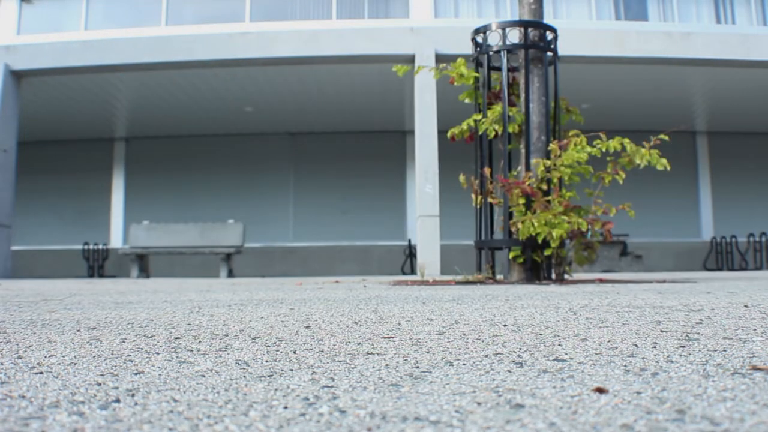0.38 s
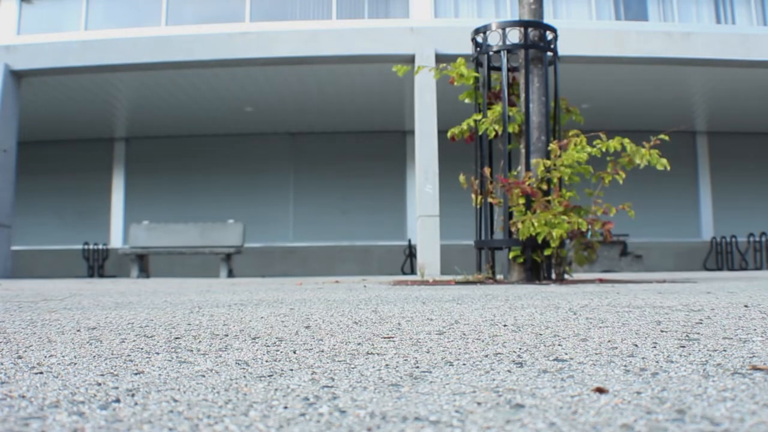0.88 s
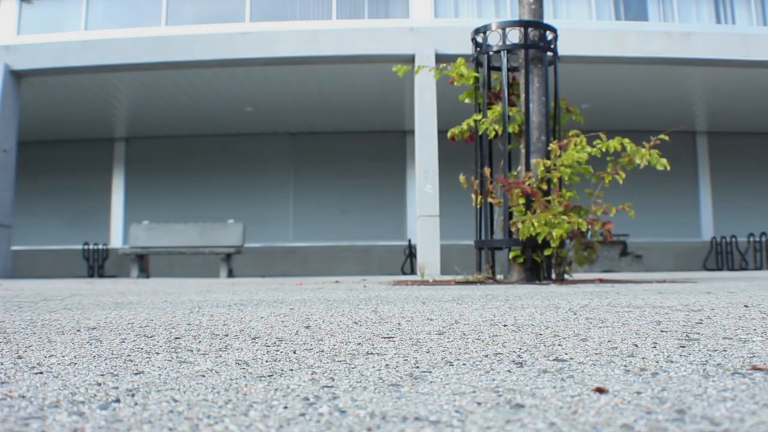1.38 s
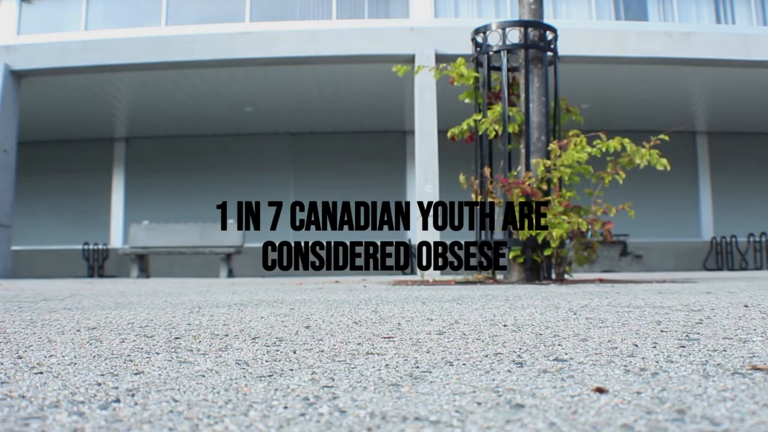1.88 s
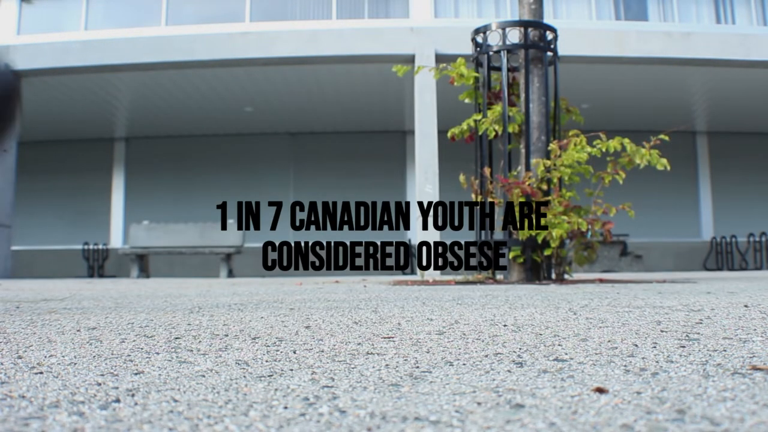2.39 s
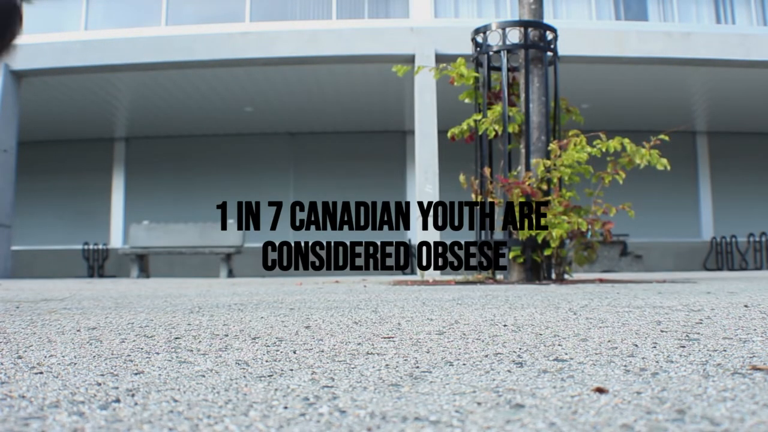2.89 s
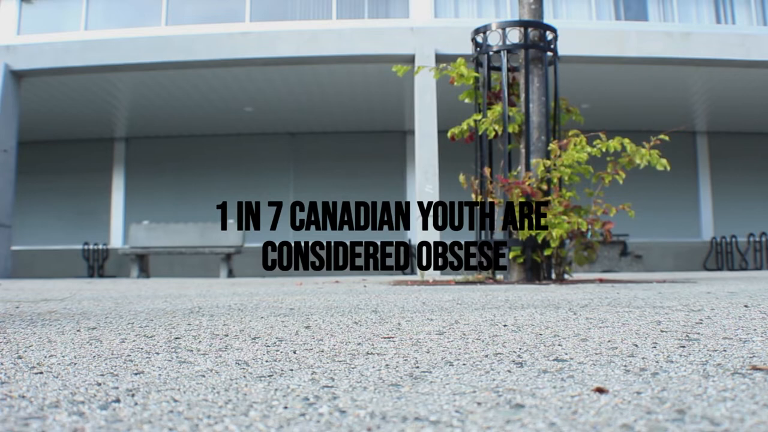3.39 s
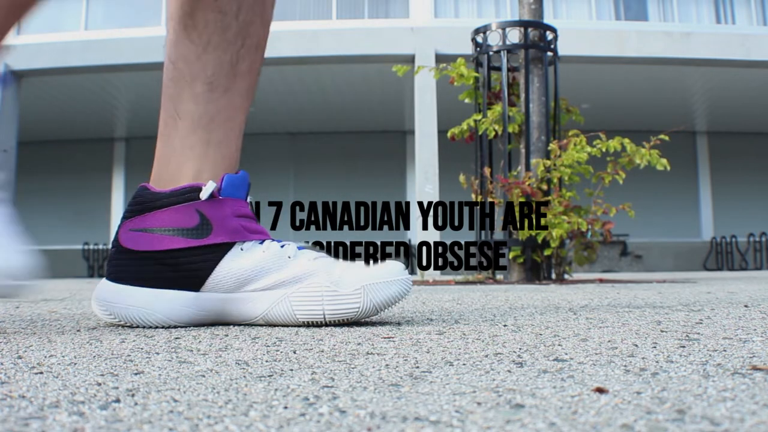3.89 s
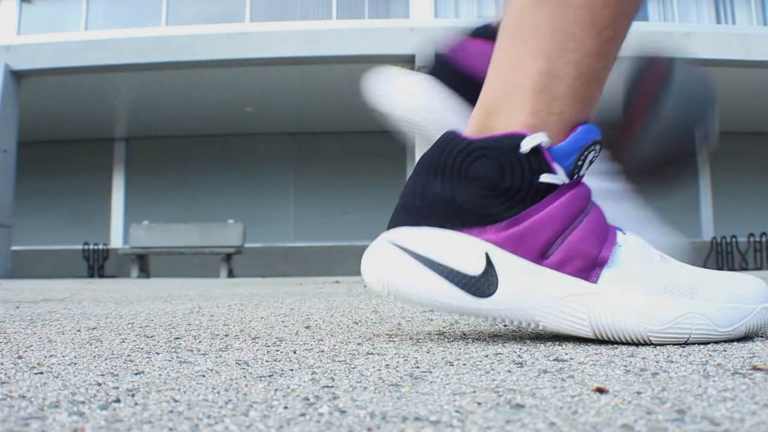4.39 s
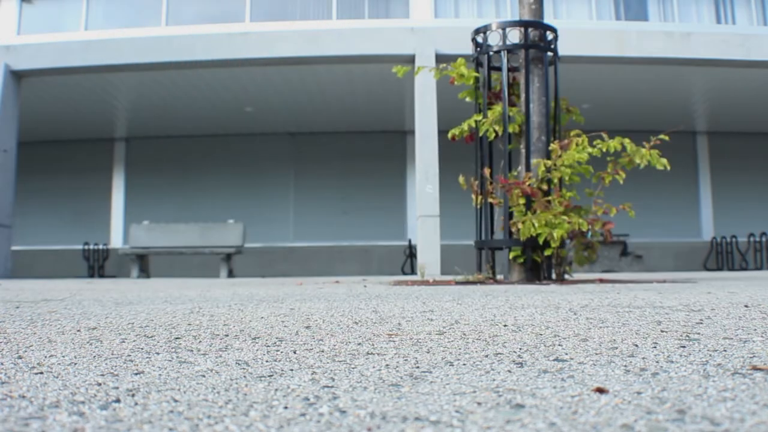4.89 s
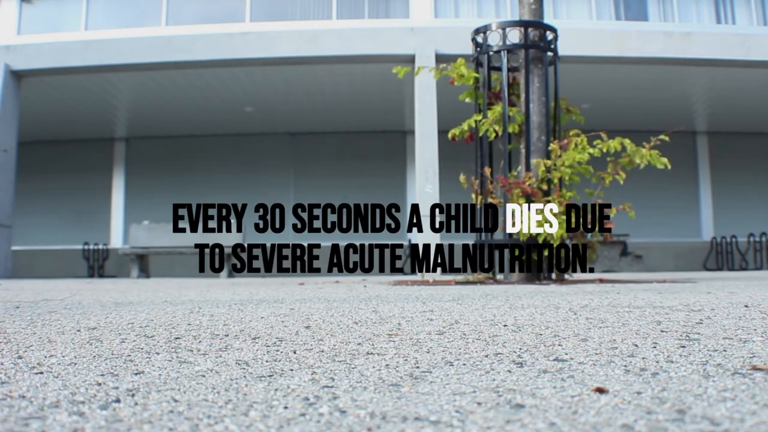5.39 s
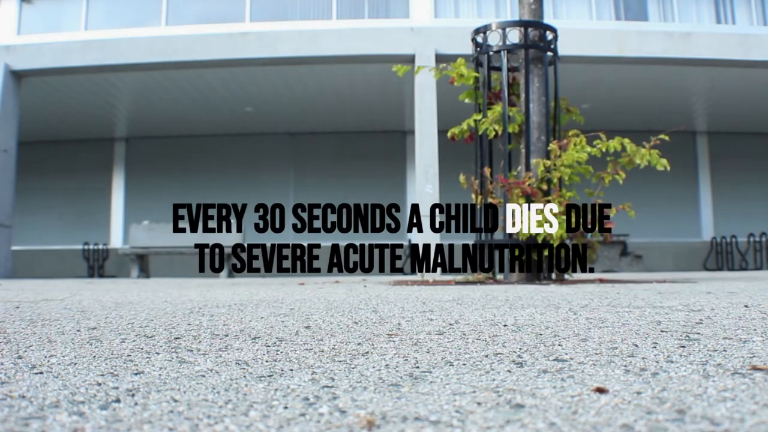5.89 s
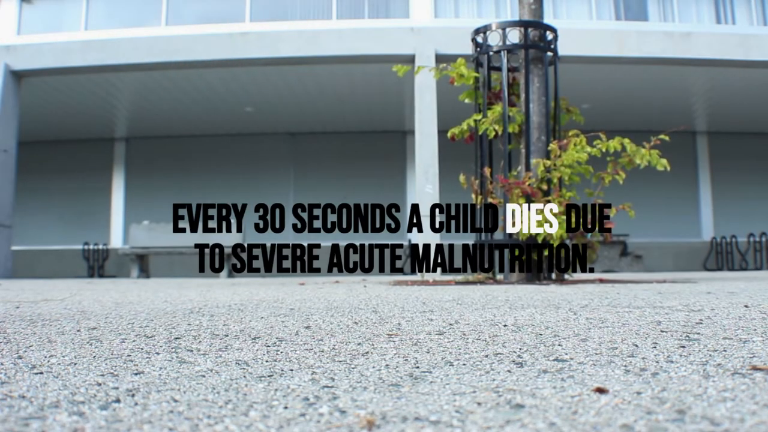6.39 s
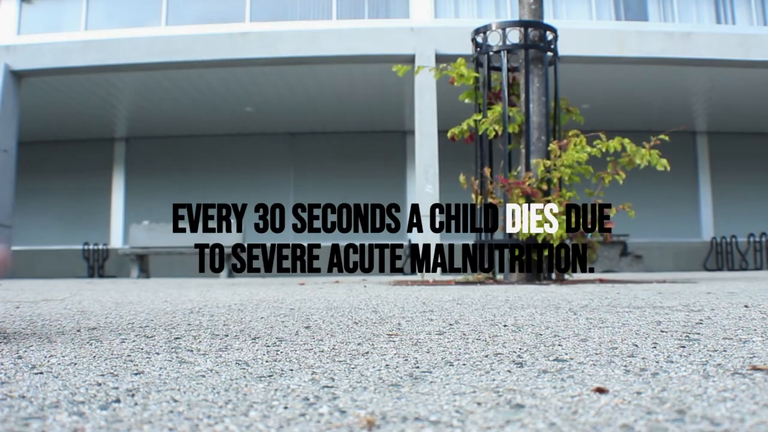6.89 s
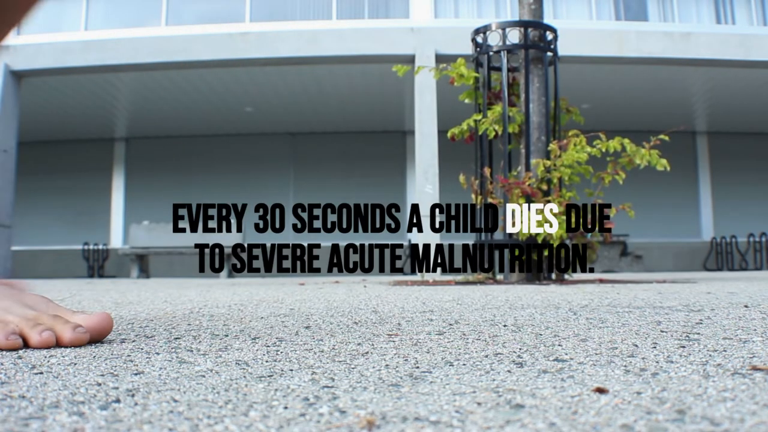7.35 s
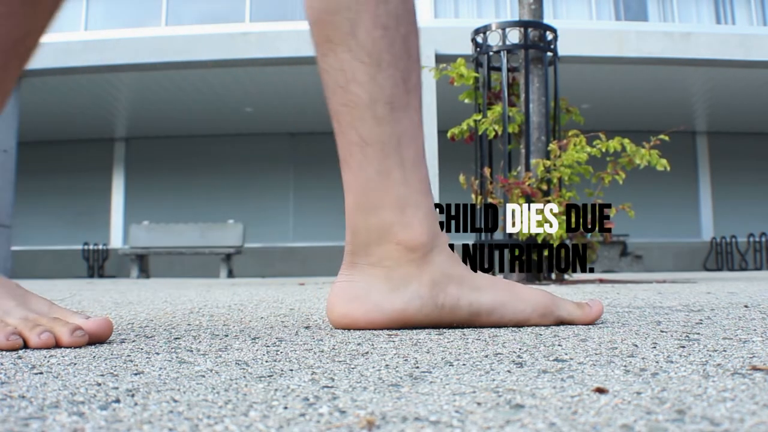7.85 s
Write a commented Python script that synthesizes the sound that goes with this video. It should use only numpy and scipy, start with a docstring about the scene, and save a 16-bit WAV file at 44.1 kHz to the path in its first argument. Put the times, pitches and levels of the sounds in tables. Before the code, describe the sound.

Outdoors, a ball is dribbled at uneven intervals on hard paving, each hit sharp and hollow, among light shoe scrapes over quiet distant traffic.

```python
"""A basketball is dribbled on concrete: each bounce is a slap, a deep thud and the ping of the air inside.
The ball is a sum of decaying modes and pulses, answered by a near wall and a building front.
Sneakers on grit are filtered noise bursts with damped heel tones; far traffic is shaped, patchy noise.
An engine drones as a wavering harmonic tone and a low noise thrum swells once.
One stretch of steps, engine and traffic is heard a second time, straight after the first."""
import sys
import numpy as np
from scipy import signal
from scipy.fft import rfft, irfft, next_fast_len
from scipy.io import wavfile
from scipy.ndimage import uniform_filter1d, map_coordinates

SR = 44100
rng = np.random.default_rng(int(sys.argv[2]) if len(sys.argv) > 2 else 0)


def store_pcm(level_fs):
    """Save levels as 16-bit WAV."""
    pcm = np.round(np.clip(level_fs, -1, 1) * 32767).astype(np.int16)
    wavfile.write(sys.argv[1], SR, np.atleast_2d(pcm).T)


def invert_db(level):
    """Linear amplitude ratio for a level in decibels (20 dB per decade), elementwise."""
    return 10 ** (np.asarray(level, dtype=float) / 20)


N = 352531  # samples


def unit(x):
    """Normalisation: scales x to rms 1."""
    return x / np.sqrt(np.mean(x ** 2) + 1e-20)


def along(points, hz):
    """Spectral interpolation: joins (Hz, value) points on a logarithmic frequency axis."""
    f, v = np.transpose(points)
    return np.interp(np.log(hz + 1), np.log(f + 1), v)


def curves(rows):
    """Linear interpolation in time: one value per sample for each column after the time."""
    s, *columns = np.transpose(rows)
    return [np.interp(np.arange(N) / SR, s, column) for column in columns]


def wobble(rate):
    """Slow random modulation: a smooth curve through rate random knots a second."""
    knots = rng.standard_normal(int(N * rate / SR) + 4)
    return map_coordinates(knots, [np.arange(N) * rate / SR])


def filtered(x, response):
    """Linear filtering: multiplies the spectrum of x by a response of frequency."""
    m = next_fast_len(x.shape[-1] + 4096)
    spectrum = rfft(x, m) * response(np.fft.rfftfreq(m, 1 / SR))
    return irfft(spectrum, m)[..., :x.shape[-1]]


def add(track, s, sound, pan_db=0):
    """Superposition: mixes a sound into the stereo track at s seconds; positive pan is left."""
    part = track[:, round(s * SR):][:, :sound.shape[-1]]
    panned = sound * invert_db([[pan_db / 2], [-pan_db / 2]])
    part += panned[:, :part.shape[1]]


# Likeness of a noise at the two channels. Each row: frequency in Hz, left-right correlation.
LIKENESS = [(25, 0.79), (60, 1), (150, 1), (380, 0.86), (950, 0.78), (2400, 0.056), (6000, 0)]


def rush(spectrum, patchy_db):
    """Diffuse-field noise of rms 1: shaped, patchy in time and frequency, its channels less alike at high pitch."""
    z = signal.stft(rng.standard_normal((2, N)), nperseg=512)[2]
    field = uniform_filter1d(rng.standard_normal(z.shape[1:]), size=5, axis=0)
    field = uniform_filter1d(field, size=12, axis=1)
    pair = signal.istft(z * invert_db(patchy_db * unit(field)), nperseg=512)[1][:, :N]

    def response(hz):
        angle = np.arccos(np.clip(along(LIKENESS, hz), -1, 1)) / 2
        return invert_db(along(spectrum, hz)) * [np.cos(angle), np.sin(angle)]

    mid, side = filtered(pair, response)
    return unit(np.array([mid + side, mid - side]))


# Course of the traffic. Each row: time in seconds, relative levels of rumble, tyres and hiss in dB,
# left-right difference in dB.
TRAFFIC_COURSE = [(0.0, -53.5, -53.5, -61.5, 1), (1.1, -54.5, -54, -61.5, 1), (1.7, -51.5, -55.5, -61, 0.8),
                  (2.9, -54.5, -56, -61, 1.3), (5.32, -54.5, -55.5, -59.5, 1.5),
                  (5.61, -56, -59.5, -62, 0.5), (6.21, -54, -59.5, -63, 1), (7.28, -53, -58, -62.5, 1),
                  (7.99, -51, -57, -62.5, 0.5)]
# Spectra of the three noises. Each row: frequency in Hz, relative density in dB.
RUMBLE_SPECTRUM = [(12, -65), (20, -30), (53, -10.5), (81, -8.5), (127, -6), (149, -10), (195, -6),
                   (700, -17), (910, -78), (1540, -120)]
TYRE_SPECTRUM = [(260, -31), (450, -3), (561, -13), (612, -13.5), (917, -0.5), (1190, -7.5), (1430, -9.5),
                 (2600, -23), (3380, -26), (5720, -120)]
HISS_SPECTRUM = [(350, -27), (600, -16.5), (781, -3.5), (988, -12), (1070, -9), (1580, -11), (1920, -14),
                 (2090, -14.5), (2760, -16.5), (14600, -32.5), (16500, -43.5)]


def traffic():
    """Incoherent sum of many far sources: rumble, tyre roar and hiss, a little to the left."""
    rumble_db, tyres_db, hiss_db, pan_db = curves(TRAFFIC_COURSE)
    rumble = invert_db(rumble_db - 0.5 + wobble(4.6)) * rush(RUMBLE_SPECTRUM, patchy_db=1)
    tyres = invert_db(tyres_db - 1.5 + 0.44 * wobble(2.9)) * rush(TYRE_SPECTRUM, patchy_db=1.6)
    hiss = invert_db(hiss_db + 4.0) * rush(HISS_SPECTRUM, patchy_db=1.85)
    return (rumble + tyres + hiss) * invert_db([pan_db / 2, -pan_db / 2])


# Course of the drone. Each row: time in seconds, mean firing frequency in Hz, relative level in dB,
# relative level of the overtones in dB.
ENGINE_COURSE = [(0, 84.7, -62, -8), (.6, 87.9, -61, -6), (1.1, 86.6, -59, -13), (1.45, 68, -64, -8),
                 (2.3, 67.5, -68, -1.5), (2.9, 72.46, -65, -4.5), (5.4, 71.7, -61, 2),
                 (5.55, 73.14, -53, -12), (5.9, 73.26, -58.5, -5), (6.03, 85.9, -56, -10),
                 (7.2, 85, -55.5, -7), (7.5, 84.55, -60.5, 0.5), (7.99, 83.2, -57, 1)]
# Engine overtones. Each row: multiple of the firing frequency, relative level in dB.
ENGINE_ORDERS = [(2, 0.5), (3, 0.5), (4, -6.5), (4.5, -10)]


def engine():
    """Periodic firing: an unsteady tone with overtones, off to one side so the left channel leads in phase."""
    hz, db, over_db = curves(ENGINE_COURSE)
    phase = 2 * np.pi * np.cumsum(hz * (1 + .002 * wobble(4))) / SR
    lead = np.array([[.3], [-.3]])  # radians
    tone = invert_db(1.2 * wobble(7)) * np.sin(phase + lead)
    for order, order_db in ENGINE_ORDERS:
        tone += invert_db(over_db + order_db + 1.5 * wobble(5)) * np.sin(order * phase + lead)
    return np.sqrt(2) * invert_db(db) * tone


def hump(f, hz, steep):
    """Resonance: a bell around hz on an octave axis, falling by steep dB one octave away."""
    return invert_db(-steep * np.log2((f + 1) / hz) ** 2)


# Soles dragged over grit. Each row: middle in seconds, nominal length in seconds, level in dB,
# tread pitch in Hz, left-right difference in dB.
DRAGS = [(0.068, 0.066, -68, 3000, -2), (0.15, 0.018, -58, 4900, 0), (0.44, 0.064, -58.5, 2820, 11),
         (0.611, 0.16, -59, 4700, -4.5), (1.219, 0.15, -67.5, 2900, -9), (1.625, .02, -49.5, 4030, 2),
         (1.648, 0.051, -36, 3700, 3), (1.679, 0.032, -48, 3700, 3), (1.753, 0.051, -49.5, 4100, 1),
         (1.788, .018, -47, 3900, 5), (1.853, 0.055, -59, 4060, -6), (3.788, 0.02, -50, 6000, 6),
         (5.397, 0.034, -48, 2504, 2), (5.437, 0.048, -63.5, 5000, -7), (5.966, 0.051, -63, 4000, 7),
         (6.067, 0.034, -60, 3280, 9), (6.523, 0.06, -61.5, 5040, 10), (6.608, .036, -61, 3300, 11),
         (7.061, 0.055, -61, 5090, 11), (7.859, 0.11, -66, 5190, 3), (7.954, 0.05, -65, 4480, 2)]


def random_clicks():
    """Random point process: further grit clicks at random moments along every slow drag."""
    per_s, slow_drag_s = 70, .052
    level_db, spread_db, pitch_spread = -54, -0.5, 0.16  # relative level; scatter of level and of log pitch
    rows = []
    for s, length, _, hz, pan_db in DRAGS:
        count = round(per_s * length * (length > slow_drag_s))
        for u, size, pitch in rng.uniform(-1, 1, (count, 3)):
            click_hz = hz * np.exp(pitch_spread * pitch)
            rows.append((s + u * length / 2, level_db + spread_db * size, click_hz, pan_db))
    return rows


# Single grit clicks at set times. Each row: time in seconds, relative peak level in dB,
# pitch in Hz, left-right difference in dB.
GRIT_CLICKS = [(0.033, -44, 3150, 2), (0.1513, -33, 4700, -8.5), (0.3608, -55, 6000, -4),
               (0.418, -49.5, 4000, -8), (0.438, -44, 2780, 11), (0.5086, -50, 5500, -10),
               (0.5528, -47, 5800, -8), (0.5904, -46, 4400, -5), (0.6025, -38.5, 4600, -7),
               (0.6215, -44.5, 2500, -6), (0.6453, -37.5, 3320, 0), (0.649, -42, 4700, -9),
               (0.6527, -43, 4630, -12), (0.7271, -38, 3240, -9), (1.1802, -47.5, 2765, -3),
               (1.2493, -45, 2570, -6), (1.282, -46, 3900, -14), (1.573, -47.5, 2900, 5),
               (1.789, -38.5, 3360, -14), (1.8517, -45, 3800, 2), (2.1355, -57, 4260, 6),
               (2.4608, -39, 2000, -14), (3.7829, -40, 5500, 0), (5.3854, -41, 3000, -5),
               (5.4463, -51, 3400, 2), (5.7432, -48, 4150, 13), (5.959, -46, 4465, -8),
               (6.1103, -52, 2300, 17), (6.5162, -52, 5270, 4), (6.5298, -48, 3900, 7),
               (6.6525, -51.5, 2293, 16), (7.0718, -48, 3960, 7), (7.212, -51, 3250, 18),
               (7.8513, -56, 4910, 8)]
# Heel taps and soft pads. Each row: time in seconds, relative level in dB, pitch in Hz,
# softness (more cycles when larger).
HEEL_TAPS = [(2.4544, -15, 580, 0.9), (2.460, -20.5, 1250, 0.69), (5.383, -24, 420, 1.5),
             (5.74, -35, 70.3, 1.0), (6.04, -39, 377, 8), (6.582, -39.5, 375, 8.3)]


def sneakers():
    """Impact and friction: grit clicks, soles drag over dense grit, heels tap."""
    out, t = np.zeros((2, N)), np.arange(SR // 100) / SR
    for s, db, hz, pan_db in GRIT_CLICKS + random_clicks():
        burst = invert_db(-60 * abs(t - .002) / .0009) * (1 + .6 * rng.standard_normal(len(t)))
        click = filtered(burst, lambda f: hump(f, hz, steep=10.1))
        add(out, s - .002, invert_db(db + 7.0) * click / abs(click).max(), pan_db)
    for s, length, db, hz, pan_db in DRAGS:
        n = round(0.99 * length * SR)
        grains = rng.standard_normal((2, n)) * rng.exponential(size=n) ** 0.66  # few large among many small
        clumps = invert_db(1.6 * np.repeat(rng.standard_normal(n // 90 + 1), repeats=90)[:n])

        def colour(f):
            # the tread rings at one pitch and above it, the sole body much lower
            tread = hump(f, hz, steep=59) + invert_db(-3.5) * hump(f, 1.28 * hz, steep=11)
            return tread + invert_db(5.5) * hump(f, 0.3 * hz, steep=7.4)

        stereo = grains[0] + 1.8 * grains * [[0], [1]]  # the right channel adds grains of its own
        drag = unit(filtered(clumps * stereo, colour))
        add(out, s - n / SR / 2, invert_db(db) * drag * signal.windows.tukey(n, .7), pan_db)
    for s, db, hz, soft in HEEL_TAPS:
        cycles = np.arange(round(3 * soft * SR / hz)) * hz / SR
        swell = np.exp(-1.6 * cycles / soft) * (1 - np.exp(-6 * cycles / soft))
        add(out, s, -invert_db(db - 2.0) * np.sin(2 * np.pi * cycles) * swell, pan_db=-2)
    return out


def slap(t, width, ring_db, ring_hz):
    """Impulse excitation: a steep suction pulse sets the skin ringing briefly, low and high."""
    t = np.maximum(t, 0)
    pulse = (t / width * np.exp(1 - t / width)) ** 1.3
    high = invert_db(-15 - 60 * t / 0.0025) * np.sin(2 * np.pi * 9000 * t)
    high += invert_db(-46 - 60 * t / .002) * np.sin(2 * np.pi * 13000 * t)
    low = invert_db(ring_db - 60 * t / .0035) * np.sin(2 * np.pi * ring_hz * t)
    return -pulse - high - low


def ring(modes, t, pace, width):
    """Modal decay: dying sines, each with one later swell that comes sooner at a higher pace."""
    total = 0
    for hz, db, t60, swell_s, swell_db in modes:
        decay = invert_db(db - 60 * t / t60)
        swell = invert_db(swell_db - 14.6 * ((t * pace - swell_s) / width) ** 2)
        total = total + (decay + swell) * np.sin(2 * np.pi * hz * t)
    return total


# Reverberation of the building front. Each row: frequency in Hz, decay time t60 in seconds.
FRONT_DECAY = [(250, 0.37), (800, 0.073), (2100, 0.093), (5500, 0.086), (14000, 0.033)]
# Spectrum of rubber cracking on concrete. Each row: frequency in Hz, relative density in dB.
CRACK_SPECTRUM = [(180, -63), (300, -5.5), (1310, -8), (1800, -4), (2360, -2.5), (3190, -7), (3840, -2.5),
                  (5550, -12.5), (6450, -8.5), (7630, -16.5), (8440, -12.5), (10500, -11.5), (16500, -73)]


def building(t):
    """Reverberation: each frequency of the crack dies at its own speed, over a weaker, slower far answer."""
    hz, s, z = signal.stft(rng.standard_normal(len(t)), SR, nperseg=128)
    fall = 60 * s / along(FRONT_DECAY, hz)[:, None]
    decay = invert_db(-fall) + invert_db(-13 - 0.23 * fall)
    tail = signal.istft(z * invert_db(along(CRACK_SPECTRUM, hz)[:, None]) * decay, SR, nperseg=128)[1]
    return tail[:len(t)] / np.std(tail[:SR // 100])


# Air modes of the flying ball; its spin sweeps a lobe past the listener. Each row: frequency in Hz,
# relative level in dB, decay time t60 in seconds, lobe time at pace 1 in seconds, relative lobe level in dB.
AIR_MODES = [(1108, -21, 0.074, 0.037, -31), (1720, -36.5, 0.14, 0.055, -40.5),
             (2000, -51, 0.12, 0.083, -85), (2267, -41, 0.31, 0.077, -48), (2329, -37.5, 0.18, .036, -44),
             (2620, -51, .1, .05, -70.5), (2864, -57.5, 0.19, 0.067, -53), (2880, -43, 0.31, 0.12, -64),
             (2930, -51, 0.22, .05, -51), (3500, -43, 0.19, 0.038, -48), (3650, -57.5, 0.78, 0.094, -64),
             (3900, -60, 0.11, 0.06975, -52), (4050, -64, 0.138, .05, -58.5), (4200, -69, 0.32, .06, -66),
             (4820, -60.5, 0.51, .05, -62), (5040, -53, .25, 0.055, -68), (5380, -52, 0.067, 0.045, -64),
             (5530, -68, 0.42, 0.03, -64), (6370, -67, 0.27, 0.075, -70)]
# Low ring of the forecourt, swelling as far walls answer. Each row: frequency in Hz, relative level in dB,
# decay time t60 in seconds, swell time at pace 1 in seconds, relative swell level in dB.
FORECOURT_MODES = [(42, -43, 0.1, 0.058, -43), (62.3, -35, .3, 0.079, -35.5),
                   (92.4, -38, .2, 0.1114, -35.5), (77.8, -37, 0.34, 0.047, -41),
                   (109.9, -55, 0.28, 0.09, -43.5), (126.2, -27, 0.36, 0.067, -40.5),
                   (147.8, -40, 0.28, 0.057, -42.5)]


def bounce(ping_db, crack_db, echo_ms, spin):
    """Impact radiation: one contact excites skin, enclosed air and ground, and the surroundings reflect it."""
    t = np.arange(SR // 4) / SR
    # the pulse comes back once it has crossed the ball
    ring_hz = 3050 / echo_ms  # a tighter contact echoes sooner and rings higher
    skin = .5 * slap(t, .00009, crack_db - 27, ring_hz)
    skin += 0.29 * slap(t - echo_ms / 1000, .00008, crack_db - 7, ring_hz)
    skin += invert_db(-14.5 - 60 * t / 0.02) * np.sin(2 * np.pi * 500 * t)
    crack = filtered(rng.standard_normal(len(t)), lambda hz: invert_db(along(CRACK_SPECTRUM, hz)))
    skin += invert_db(-13.5 - 60 * t / 0.0064) * unit(crack)

    def reflection(hz):
        # a near wall returns the slap twice, duller: first upside down, then upright
        lag = np.exp(-2j * np.pi * hz * .0145)
        dulling = 0.0567 + 1 / (1 + (hz / 800) ** 2.7)
        return (invert_db(-14.5) * lag - invert_db(-3)) * lag * dulling

    wall = filtered(skin, reflection)
    # the squashed ball pumps air for as long as it touches the ground
    contact = np.clip(t / 0.0176, 0, 1)
    thud = 0.25 * np.sin(np.pi * contact ** 1.24) * np.sin(2 * np.pi * 101 * (t - .0019))
    thud += 0.082 * np.sin(np.pi * contact) ** 0.2 * np.sin(2 * np.pi * contact)  # the ground gives and returns
    # squashed, the lowest air mode is higher and damped
    ping = -invert_db(-15.5 - 60 * (t / 0.031) ** 2.26) * np.cos(2 * np.pi * 1216 * t)
    rise = 1 - np.exp(-t / 0.0018)
    low_air = ping + rise * ring(AIR_MODES[:1], t, spin, width=0.011)
    high_air = rise * ring(AIR_MODES[1:], t, spin, width=0.0097)
    air = invert_db(ping_db) * low_air + invert_db(0.095 * crack_db - 2.0) * high_air
    boom = np.clip((t - .012) / .01, 0, 1) * ring(FORECOURT_MODES, t, 0.863, width=0.017)
    front = invert_db(0.51 * crack_db - 36.0) * rise * building(t)
    fade = np.clip((.155 - t) / 0.01, 0, 1)  # the bounce is cut short here with a brief fade
    return (skin + wall + thud + air + boom + front) * fade


# Bounces of the ball. Each row: contact in seconds, relative ping level in dB, relative skin ring level in dB,
# slap echo inside the ball in milliseconds, relative air push level in dB.
CONTACTS = [(1.4895, -1.5, 5.5, 0.83, 1), (2.366, -1.5, 5, 0.84, 1.5), (2.8238, -9.5, 15.5, 0.9, -5),
            (3.6892, -11.5, 8.5, 0.626, 6), (4.3674, -1.5, 5, 0.832, 0), (4.9936, -0.5, 5, 0.87, 1)]


def ball():
    """Displacement flow and impact: the falling ball pushes one slow wave of air ahead of every bounce."""
    bounce_db, spin_ms = -1.2, 0.79  # spin_ms: echo of a contact that leaves the usual spin
    out, u = np.zeros((2, N)), np.arange(round(.075 * SR)) / (.075 * SR)
    push = -np.sin(np.pi * u) * np.sin(3 * np.pi * u)
    for s, ping_db, crack_db, echo_ms, push_db in CONTACTS:
        spin = spin_ms / echo_ms  # tighter contact, faster spin
        add(out, s - .0001, invert_db(bounce_db) * bounce(ping_db, crack_db, echo_ms, spin))
        add(out, s - .082, invert_db(push_db - 38.5) * push)
    return out


def again(x):
    """Repetition by time shift: a stretch of x placed right after itself, and the equal-power gap for it."""
    from_s, length_s, fade_s = .44, 2.4608, .02
    t = np.arange(N) / SR - from_s - length_s
    share = np.clip(np.minimum(t, length_s - t) / fade_s, 0, 1)
    return np.roll(x, round(length_s * SR), axis=1) * np.sqrt(share), np.sqrt(1 - share)


# Spectrum of the thrum. Each row: frequency in Hz, relative density in dB.
THRUM_SPECTRUM = [(20, -30), (45, 4), (60, -4), (90, -14), (103, 15), (118, -2), (250, -46)]


def thrum():
    """Partial coherence: low band noise swells once, partly different in the two channels."""
    start_s, attack_s, hold_s, release_s, level_db = 5.4, 0.11, 0.44, .13, -51.5
    a, b = filtered(rng.standard_normal((2, N)), lambda hz: invert_db(along(THRUM_SPECTRUM, hz)))
    t = np.arange(N) / SR - start_s
    end_s = attack_s + hold_s + release_s
    swell = np.clip(np.minimum(t / attack_s, (end_s - t) / release_s), 0, 1) ** 2
    return invert_db(level_db) * swell * unit(np.array([a + .5 * b, a - .5 * b]))


def scene():
    """Superposition of all sources: repeated steps are added, repeated engine and traffic are cross-faded."""
    far, steps = traffic() + engine(), sneakers()
    far_again, gap = again(far)
    steps_again, _ = again(steps)
    return gap * far + far_again + steps + steps_again + ball() + thrum()


def top_cut(x):
    """Nothing passes above the cut-off."""
    return signal.sosfilt(signal.butter(12, 16910, fs=SR, output="sos"), x)


def record(dry):
    """Linear superposition is complete here: the finished mix goes out at unchanged gain."""
    return top_cut(dry)


dry = scene()
out = record(dry)
store_pcm(out)
```